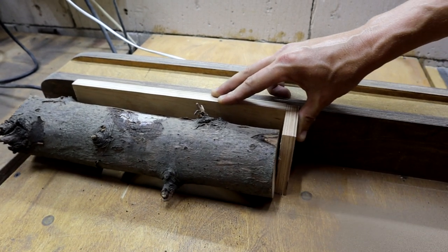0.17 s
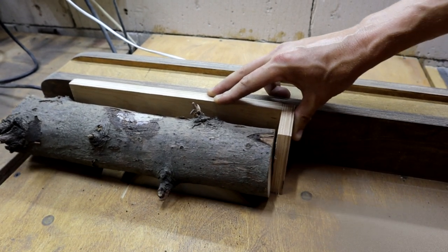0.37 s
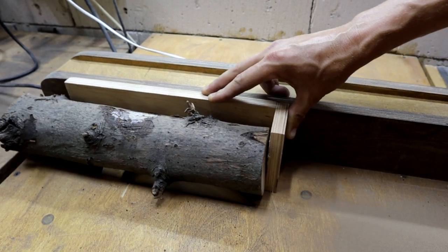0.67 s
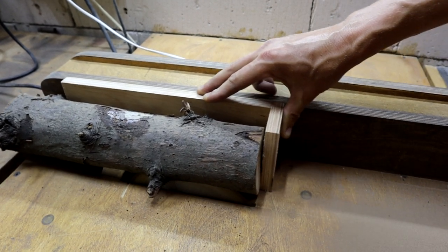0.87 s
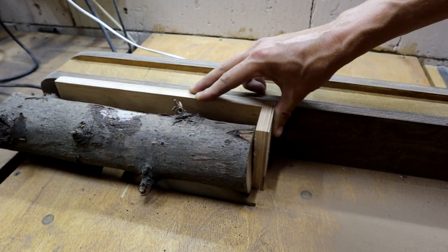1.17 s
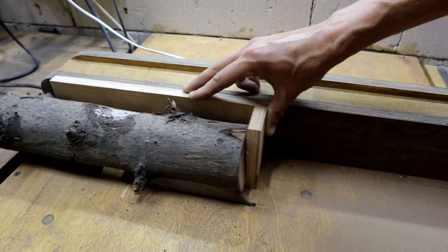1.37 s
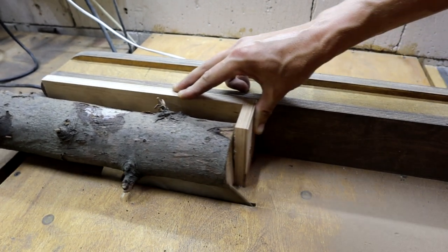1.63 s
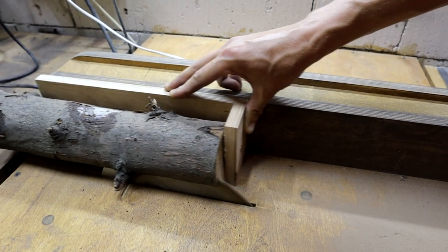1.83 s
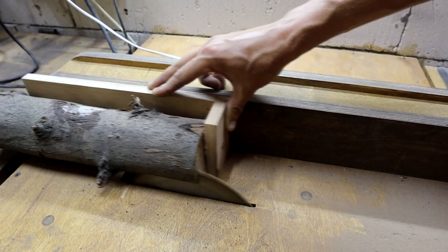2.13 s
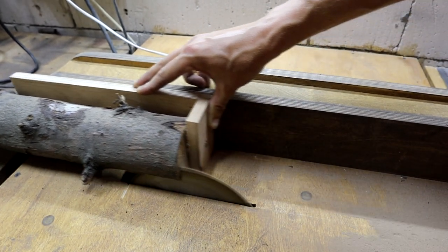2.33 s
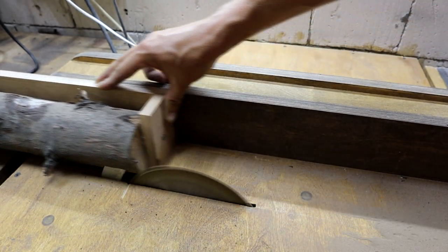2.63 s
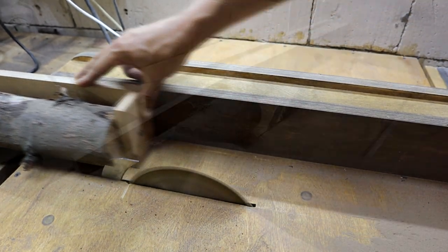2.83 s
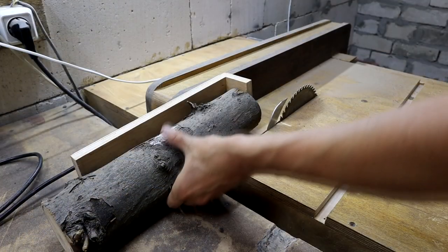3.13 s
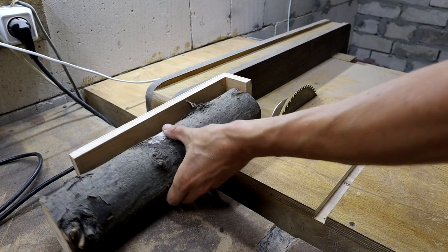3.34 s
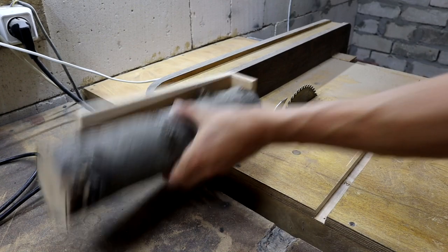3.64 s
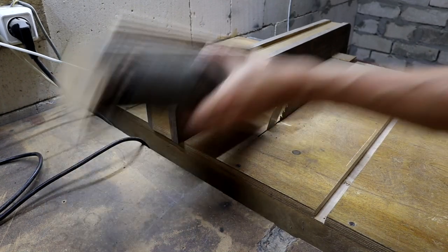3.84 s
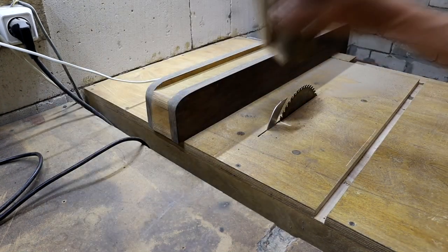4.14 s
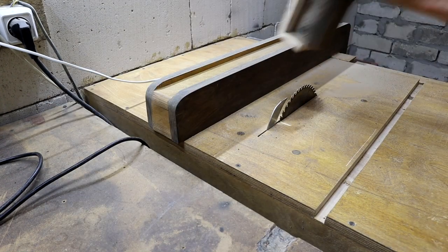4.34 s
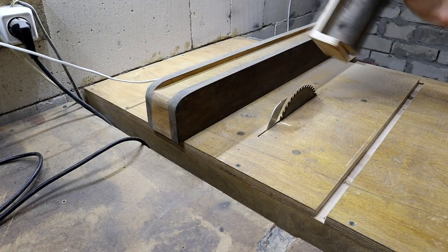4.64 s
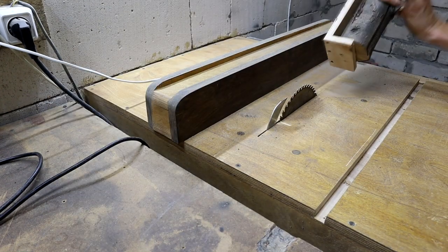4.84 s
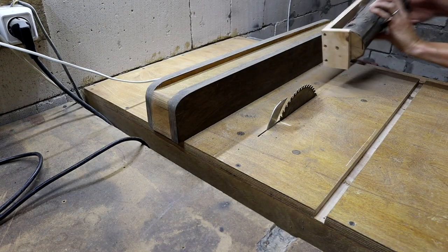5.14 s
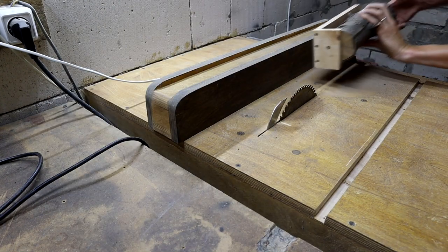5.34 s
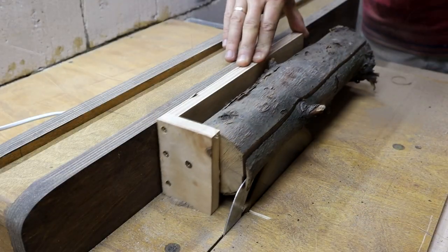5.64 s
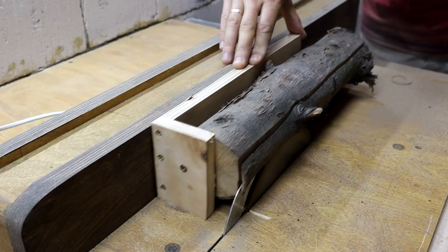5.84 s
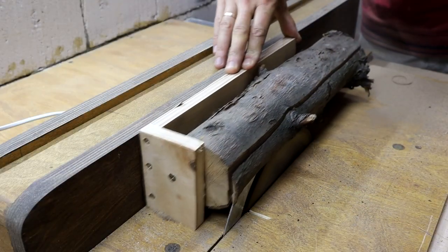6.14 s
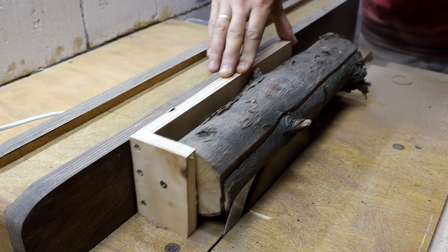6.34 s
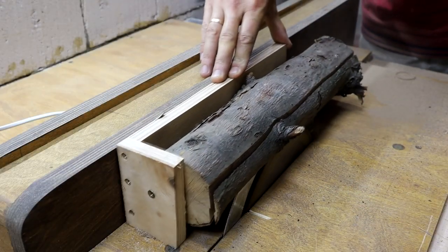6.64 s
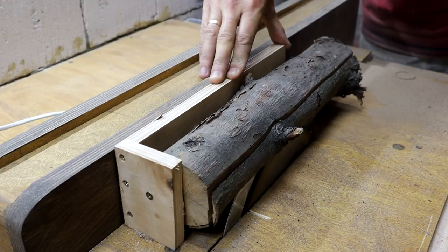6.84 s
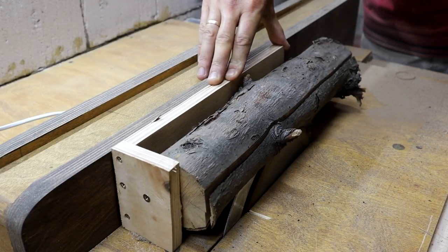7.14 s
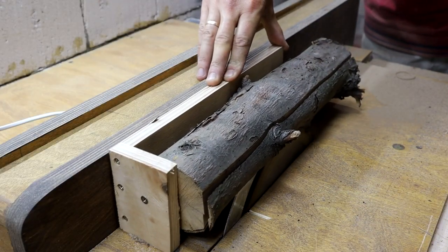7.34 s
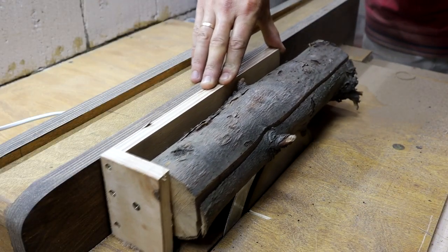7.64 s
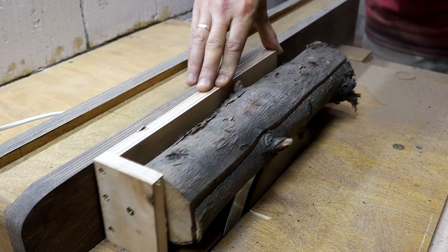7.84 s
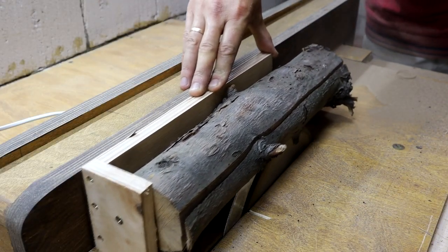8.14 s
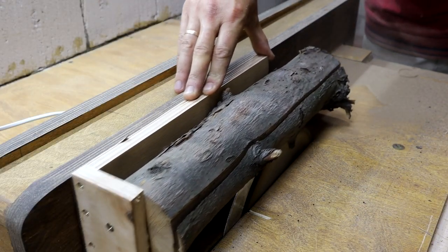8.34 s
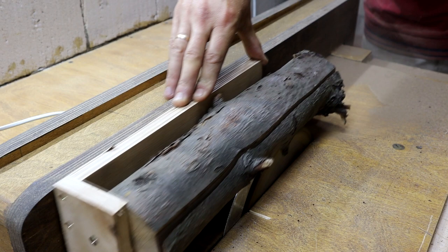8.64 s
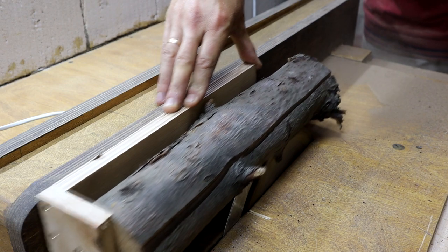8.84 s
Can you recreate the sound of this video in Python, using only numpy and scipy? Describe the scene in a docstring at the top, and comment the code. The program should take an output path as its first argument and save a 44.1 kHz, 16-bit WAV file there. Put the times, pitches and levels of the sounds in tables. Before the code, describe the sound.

From 0 s a table-mounted circular saw is cutting a log: low motor hum near 300 Hz, a rough gear whine around 2 kHz and broadband tearing, hissing chips, with uneven low rumbles in the first second. From about 1.5 s the load eases and pitch climbs steadily by roughly a third; squealing teeth swell around 2.4 s, chip noise drops near 2.7 s, and the free whine fades out by 3.2 s. Quiet workshop air remains. At 3.4 s the log scrapes and thuds, with the heaviest hollow table thump at 3.65 s; light ticks and scrapes follow until 4.0 s. A bright cluster of wooden knocks lands around 4.25 s, then only soft rustles near 5 s. At 5.5 s a second cut fades in quickly, louder and harsher, with gritty tooth hammering and buzzing whine, rising slightly until 6.8 s, then sagging in pitch under load, still sawing at 9 s.

```python
"""Circular saw in a workshop

A geared circular saw under a plywood table rips a log, runs free as the log clears it and fades out.
In the quiet workshop the log and its sled are dragged, lifted and knocked; then a second cut fades in.
Motor, gear mesh and blade teeth are tones in fixed ratios, and chips are shaped noise. Wood struck is a
sum of dying modes and wood dragged is noise through resonances. A mid-side microphone hears it all."""
import sys
import numpy as np
from scipy import signal
from scipy.fft import rfft, irfft, next_fast_len
from scipy.io import wavfile
from scipy.ndimage import uniform_filter1d

SR = 44100
rng = np.random.default_rng(int(sys.argv[2]) if len(sys.argv) > 2 else 0)


def to_wav(s):
    """Save 16-bit WAV."""
    ch = np.atleast_2d(s).T  # columns
    pcm = np.round(np.clip(ch, -1, 1) * 32767)  # PCM
    wavfile.write(sys.argv[1], SR, pcm.astype(np.int16))


N = 396900


def amp(db):
    """Decibel law: amplitude grows tenfold per 20 dB."""
    return 10 ** (np.asarray(db) / 20)


def evened(x):
    """Power normalisation: scales to an rms of 1."""
    return x / np.sqrt(np.mean(x ** 2) + 1e-20)


def read(points, hz):
    """Logarithmic frequency scale: reads a curve between its points."""
    f, value = np.transpose(points)
    return np.interp(np.log(hz + 1), np.log(f + 1), value)


def add(mix, start_s, sound):
    """Superposition: adds a sound from its start time on."""
    part = mix[:, round(start_s * SR):][:, :sound.shape[1]]
    part += sound[:, :part.shape[1]]


def drift(size, span_s):
    """Low-pass random fluctuation: two slow curves of about rms 1."""
    step = 32
    width = max(int(span_s * SR / step), 1)
    noise = rng.standard_normal((2, size // step + 2))
    slow = evened(uniform_filter1d(uniform_filter1d(noise, width), width))
    return np.array([np.interp(np.arange(size) / step, np.arange(slow.shape[1]), row) for row in slow])


def coloured(x, gain):
    """Linear filtering: multiplies the spectrum by a gain given as a function of frequency."""
    size = next_fast_len(x.shape[-1])
    return irfft(rfft(x, size) * gain(np.fft.rfftfreq(size, 1 / SR)), size)[..., :x.shape[-1]]


def humps(modes):
    """Resonance: the powers of the single-mode response curves add."""
    return lambda hz: np.sqrt(sum(amp(2 * db) / (1 + (2 * (hz - f) / w) ** 2) for f, w, db in modes))


# Microphone side level, per cut: (frequency [Hz], side relative to mid [dB])
WIDTHS = [
    [(60, -15), (110, -90), (200, -9.5), (370, -0.5), (690, -2.5), (1270, 0), (2330, -1), (4280, 4.5),
     (7880, 2), (14500, 23.5)],
    [(60, -8), (110, -94), (200, -32), (370, -0.5), (690, -6.5), (1270, 0.5), (2330, 0), (4280, 5.5),
     (7880, 5.5), (14500, 4.5)],
]
# Lateral lean, per cut: (frequency [Hz], share of the side that follows the mid [-], + is left)
LEANS = [
    [(100, -2.1), (370, 0.21), (700, 0.22), (1300, 0.17), (2300, -0.094), (4300, 0.49), (7900, -0.77),
     (14000, -0.62)],
    [(100, 0), (370, -0.24), (700, 0.63), (1300, -0.054), (2300, -0.19), (4300, 0.13), (7900, -0.75),
     (14000, -0.58)],
]
# Phase turn, per cut: (frequency [Hz], share of the side a quarter wave from the mid [-])
TWISTS = [
    [(300, -0.59), (900, -0.41), (2200, -0.086), (3500, 0.52), (7000, -0.42), (12000, 0)],
    [(300, -0.72), (600, 0.2), (1500, -1.2), (2600, 0.87), (5000, 0.34), (12000, -0.79)],
]


def heard(pair, k):
    """Mid-side pick-up: the side mixes the direct sound, turned in phase, with an unrelated reflected one."""
    def width(hz):
        return amp(read(WIDTHS[k], hz))

    def lean(hz):
        share = read(LEANS[k], hz) + 1j * read(TWISTS[k], hz)
        return share / np.maximum(abs(share) / .99, 1)

    direct = coloured(pair[0], lambda hz: width(hz) * lean(hz))
    reflected = coloured(pair[1], lambda hz: width(hz) * np.sqrt(1 - abs(lean(hz)) ** 2))
    side = direct + reflected
    return np.array([pair[0] + side, pair[0] - side])


# Fade of each cut: (silent at [s], full at [s])
FADES = [(3.18, 3.048), (5.485, 5.58)]


def fade(t, k):
    """Linear amplitude ramp: gain of one cut as it fades in or out."""
    silent, full = FADES[k]
    return np.clip((t - silent) / (full - silent), 0, 1)


# Colour of the workshop air: (frequency [Hz], relative level per Hz [dB])
AIR_SPECTRUM = [(15, -56), (25, 12), (78, 3), (99, -16), (328, -12.5), (364, -13.5), (497, -17.5),
                (552, -17.5), (597, -17), (1300, -22.5), (2200, -25.5), (2700, -23.5), (3400, -30.5),
                (8690, -36.5), (10700, -44), (12500, -85), (16200, -64), (22000, -120)]
AIR_DB = -42
AIR_FADED = 0.84  # share of the workshop air that gives way to a cut


def hush():
    """Stationary coloured noise: the air of the workshop, cross-faded with the two cuts."""
    t = np.arange(N) / SR
    noise = rng.standard_normal((2, N)) * amp(0.5 * drift(N, 0.014)[0])
    air = amp(AIR_DB) * evened(coloured(noise, lambda hz: amp(read(AIR_SPECTRUM, hz))))
    return heard(air, 0) * (1 - AIR_FADED * (fade(t, 0) + fade(t, 1)))


# Faint bright clicks: (time [s], peak level before the microphone [dB])
CLICKS = [(3.146, -50), (3.354, -48), (3.482, -43), (3.492, -48), (5.465, -50)]
# Click colour: (frequency [Hz], width [Hz], level [dB])
CLICK_BAND = (7800, 4100, 0)


def clicks():
    """Impulsive noise: short bright clicks that decay exponentially."""
    out, t = np.zeros((2, N)), np.arange(600) / SR
    for start_s, db in CLICKS:
        noise = rng.standard_normal((2, 600))
        burst = coloured(noise, lambda hz: humps([CLICK_BAND])(hz) ** 2) * np.exp(-t / 0.0036)
        add(out, start_s, amp(db) * burst / abs(burst).max())
    return heard(out, 1)


# Rasp colour: (frequency [Hz], relative level per Hz [dB])
RASP = [(59, -31), (100, -2), (246, -16), (517, -20), (803, -26), (1060, -17.5), (3400, -22), (7420, -24),
        (12000, -47.5), (15600, -97), (22000, -120)]
DRAG_ENDS_DB = -21.5  # where a stroke starts and stops, below its peak


def drag(modes, stutter_db, start_s, rise, fall, peak_db, share):
    """Friction excitation: gritty noise, part of it stuttering through the wood's resonances."""
    t = np.arange(0, rise + fall, 1 / SR)
    db = peak_db + DRAG_ENDS_DB * np.maximum(1 - t / rise, (t - rise) / fall) ** 2
    grit = rng.standard_normal((2, len(t))) * amp(0.82 * drift(len(t), .002)[0])
    rasp = evened(coloured(grit, lambda hz: amp(read(RASP, hz))))
    stutter = grit * amp(stutter_db * drift(len(t), 0.0082)[0])
    chatter = evened(coloured(stutter, lambda hz: humps(modes)(hz) ** 1.75))
    sound = amp(db) * (np.sqrt(1 - share) * rasp + np.sqrt(share) * chatter)
    return start_s, heard(sound * signal.windows.tukey(len(t), .1), 1)


# Scrapes of bark and sled, soft rustles, and the hiss that goes with the knocks:
# (start [s], rise [s], fall [s], peak level [dB], power share that chatters in the wood [0-1])
DRAG = [(3.37, 0.047, 0.085, -38.5, 0.97), (3.16, 0.022, 0.088, -48, 0.2), (3.57, 0.14, 0.19, -52, 0.65),
        (3.79, 0.077, 0.051, -40.5, 0.9), (3.9, 0.052, 0.03, -40.5, 0.94), (3.99, 0.017, 0.044, -46, 0.7),
        (4.16, 0.024, 0.086, -44, 0.56), (4.22, 0.019, 0.063, -38, 0), (4.315, 0.0064, 0.049, -40.5, 0),
        (4.47, 0.057, .08, -61, 0.3), (4.915, 0.028, 0.08, -50, 0.16), (4.98, .03, 0.07, -51, 0),
        (5.04, 0.03, 0.088, -50.5, 0.2), (5.16, 0.034, 0.094, -54.5, 0), (5.27, 0.037, .04, -53, 0)]
# Resonances of the log shoved along: (frequency [Hz], width [Hz], level [dB])
BARK = [(805, 81, 2), (1660, 310, -5.5), (2230, 93, -5), (3080, 890, -7), (4420, 300, -16),
        (4860, 200, -10.5), (5750, 200, -18)]
# Resonances of the sled: (frequency [Hz], width [Hz], level [dB])
CHATTER = [(477, 17, 14.5), (753, 104, 15), (1123, 35, 11), (1490, 140, 13), (2220, 140, 7),
           (2580, 230, 10.5), (3040, 140, 1), (4020, 100, -5), (5240, 110, -22)]
# Unevenness of the chatter: bark, sled [dB]
STUTTER_DB = [1.5, -2.5]


def drags():
    """Friction: the first stroke rings the bark, the others rasp or chatter in the sled."""
    out = np.zeros((2, N))
    for i, row in enumerate(DRAG):
        add(out, *drag(CHATTER if i else BARK, STUTTER_DB[i > 0], *row))
    return out


def struck(modes, tilt_db, contact_s, rough, wake_s, detune=0.037):
    """Modal synthesis: dying modes, detuned by where the wood is hit; a soft push with a gritty wake."""
    t = np.arange(SR // 2) / SR
    ring = 0
    for hz, db, t60 in modes:
        level = amp(db + tilt_db * np.log2(hz / 700) - 60 * t / t60)
        ring = ring + level * np.sin(2 * np.pi * hz * rng.normal(1, detune) * t)
    wake = (t[:4000] == 0) + rough * rng.standard_normal(4000) * np.exp(-t[:4000] / wake_s)
    push = np.hanning(max(int(contact_s * SR), 3))
    ring = signal.fftconvolve(ring, np.convolve(wake, push))
    return ring / abs(ring).max()


# Reverberation of the workshop: (frequency [Hz], t60 [s])
SHOP = [(200, 0.66), (700, 0.079), (1500, 0.35), (4000, 0.9), (9000, 1)]


def echo(dry):
    """Reverberation: sparse random reflections that decay at a rate set by frequency."""
    taps = rng.choice([-1., 1.], (2, SR // 2)) * (rng.random((2, SR // 2)) < .05)
    hz, t, z = signal.stft(taps, SR, nperseg=256)
    tail = signal.istft(z * amp(-60 * t / read(SHOP, hz)[:, None]), SR, nperseg=256)[1]
    return signal.fftconvolve(dry, tail / np.linalg.norm(tail[0]), axes=1)[:, :N]


# Log dropped on the hollow table: (time [s], peak level of the dry blow [dB])
THUDS = [(3.371, -15.5), (3.392, -26), (3.591, -29.5), (3.615, -35), (3.652, -6), (3.69, -10.5),
         (3.72, -21), (3.762, -47), (3.86, -27), (3.902, -30), (3.951, -40), (3.991, -46)]
# Modes of the table: (frequency before detuning [Hz], level [dB], t60 [s])
TABLE = [(98, -2.5, 0.54), (123.8, -3, 0.44), (158, -7.5, 0.28), (217, 1.5, 0.24), (256, -10, 0.16),
         (302, 8.5, 0.055), (343, -9, 0.061), (404, 7, 0.04), (480, -30, 0.049), (590, -10, .06)]
# Sled knocked against wood: (time [s], peak level of the dry blow [dB], brightness [0-1])
KNOCKS = [(4.167, -20.5, 0.25), (4.221, -18, 0.3), (4.2355, -7.5, 0.88), (4.239, -8, 0.83),
          (4.245, -20, 0.72), (4.25, -11.5, 1), (4.261, -16, 1), (4.286, -30, 0.85), (4.319, -22.5, 0.26),
          (4.332, -24, 0.25)]
# Modes of the sled: (frequency before detuning [Hz], level [dB], t60 [s])
SLED = [(276, -28, 0.12), (350, 2, 0.061), (455, 11, 0.055), (620, -0.5, 0.13), (752, 23, 0.028),
        (950, 16.5, 0.028), (1215, 27.5, 0.017), (1390, 8.5, 0.016), (1700, -5, 0.025), (1900, -14, .02),
        (2530, -25, .03), (3400, -4, .03), (4080, -13, .03), (5500, -7, .03)]
# Loose sled ticking as it is lifted: (time [s], peak level of the dry blow [dB], tilt [dB per octave])
TICKS = [(3.582, -48, -3), (3.6043, -35.5, 0), (3.6449, -31, -2), (3.682, -41, 4), (3.756, -32, 10),
         (3.7764, -34, 13), (3.796, -37, 16.5), (3.815, -32, 24), (3.8367, -29, 16), (3.852, -28, 15),
         (3.864, -34, 6), (3.881, -27, 11), (3.903, -28, 18), (3.928, -28, 10), (3.95, -29, 10),
         (3.965, -39, 8), (3.987, -41, 18), (3.9994, -28, 6), (4.009, -35, 16), (4.021, -41, 10)]
# The far face of the sled rings apart from the near one; the knocks lie to the right
KNOCK_FLANK_DB, KNOCK_RIGHT_DB = -3, -3


def blows():
    """Impact excitation: thuds, knocks and ticks with the workshop's answer."""
    dry, aside = np.zeros((1, N)), np.zeros((1, N))
    for start_s, db in THUDS:
        add(dry, start_s, amp(db) * struck(TABLE, 0, 0.0024, 0.027, 0.029)[None])
    for start_s, db, bright in KNOCKS:
        tilt_db = 18 * (bright - .75)
        contact_s = 0.0014 * np.maximum(1 - bright, .1)  # a brighter knock touches more briefly
        near = amp(db) * struck(SLED, tilt_db, contact_s, 0.055, 0.016)[None]
        flank = amp(db) * struck(SLED, tilt_db, contact_s, 0.055, 0.016)[None]
        add(dry, start_s, near)
        add(aside, start_s, amp(KNOCK_FLANK_DB) * flank - amp(KNOCK_RIGHT_DB) * near)
    loose_modes = [(hz, db, 4.6 / width) for hz, width, db in CHATTER]  # wide resonances die sooner
    for start_s, db, tilt_db in TICKS:
        add(dry, start_s, amp(db) * struck(loose_modes, tilt_db, .0001, 0.11, 0.0045, 0.016)[None])
    # the blows carry little below 75 Hz
    dry = signal.sosfilt(signal.butter(2, 75, "high", fs=SR, output="sos"), dry)
    wet = echo(dry)
    sound = heard(np.array([dry[0] + amp(-10.0) * wet[0], amp(-1.5) * wet[1]]), 1)
    return sound + [[1], [-1]] * coloured(aside, lambda hz: amp(read(WIDTHS[1], hz)))


# Moments when one sound swells or dips, by sound: (peak time [s], length [s], change [dB])
SWELLS = { "rumble": [(0.53, 0.62, 18), (0.75, 0.23, 11.5), (1.0, 0.17, 9.5), (1.16, 0.1, 9),
          (7.97, 0.042, 5), (8.25, .1, 4)], "roar": [(2.39, 0.11, 9), (2.52, 0.21, 5.5), (2.67, 0.12, 9)],
          "hiss": [(2.44, 0.18, 5.5), (2.56, 0.18, 6.5), (6.78, 0.15, 1)], "hum": [(.53, .08, 0),
          (.68, 0.14, -6), (1.0, 0.066, -3), (1.33, 0.055, -5), (8.37, 0.087, 4)],
          "tooth 2": [(.05, 0.56, 5), (1.3, 0.99, -5), (1.755, 0.068, 5), (1.92, 0.42, -2),
          (2.17, .14, 8.5), (2.31, 0.15, -5)], "tooth 4": [(.15, 0.52, 6), (1.0, 0.49, -3), (1.75, .5, -7),
          (2.05, 0.18, 9), (2.2, .1, -5), (5.71, 0.35, 7), (6.63, 0.26, 8), (7.0, 0.89, 4.5)],
          "tooth 5": [(1.7, 0.57, 15), (6.1, 0.17, 6), (6.34, 0.15, 11), (6.75, 0.17, 8), (7.1, 0.79, 5.5),
          (7.61, 0.46, 4)], "song": [(7.08, 0.73, 14.5), (8.24, 1, 9.5), (8.87, 0.26, 8)], }


def swell(t, name):
    """Raised-cosine envelope: extra dB of one sound over time."""
    return sum(db * np.cos(np.pi * np.clip((t - s) / span, -.5, .5)) ** 2 for s, span, db in SWELLS[name])


SPELL_EDGE_S = 0.026


def spell(t, rows, gain):
    """Trapezoidal envelope: sum of flat spells with short edges."""
    return sum(gain(db) * np.clip(np.minimum(t - start, end - t) / SPELL_EDGE_S + .5, 0, 1)
               for start, end, db in rows)


# Centres of the rumble, log body, roar and hiss bands [Hz]
BAND_HZ = (150, 800, 2900, 7000)
# Chip noise colour, per cut: (frequency [Hz], relative level per Hz [dB])
ROAR = [
    [(30, -25), (75, -8), (95, 6.5), (150, 5), (300, -4), (500, -16), (1000, -22), (1600, -17), (2100, -8),
     (3000, -4.5), (3600, -11.5), (4500, -4.5), (6000, -2.5), (8000, 6), (10000, -7.5), (12000, -39),
     (15000, -70)],
    [(30, -45), (75, -28), (95, -4.5), (130, -4), (250, -11.5), (500, -6.5), (800, -5), (1300, -6),
     (2300, -7), (3600, -8.5), (4700, -8), (5800, -10.5), (8200, -8.5), (10500, -28.5), (12500, -22),
     (14000, -34), (15000, -47)],
]
# Blade and table resonances that chips excite, per cut: (frequency [Hz], width [Hz], level [dB])
RINGS = [
    [(1973, 31, -12), (2640, 15, -10), (2640, 29, -13), (2440, 24, -8), (3310, 20, -4), (3980, 250, -12.5),
     (4600, 19, -1), (4880, 33, -6), (5240, 93, -5.5), (6750, 12, 5.5), (8100, 21, -15), (8450, 33, -7)],
    [(476, 74, 5.5), (558, 21, 10.5), (818, 60, 11), (2180, 100, 2.5), (2715, 59, 4), (2920, 39, -19),
     (4530, 110, 3), (6130, 32, -26), (6800, 53, -3), (7780, 61, -25), (8640, 28, 5), (9460, 79, -2.5)],
]
# Ringing relative to the chip noise before band levelling, per cut [dB]
RING_DB = [-6.5, -3.5]
SLOTS = 3  # expansion slots in the blade


def roar(t, blade, bands_db, k):
    """Amplitude-modulated noise: chips tear off in patches, pulsed by the blade, with ringing bands."""
    bites = 1 + 0.16 * np.cos(2 * np.pi * blade) + 0.14 * np.cos(2 * np.pi * SLOTS * blade)
    chips = rng.standard_normal((2, len(t))) * amp(1.9 * drift(len(t), .003)[0]) * bites
    sound = evened(coloured(chips, lambda hz: amp(read(ROAR[k], hz))))
    # reversed chips keep the ringing unrelated to the noise
    sound = sound + amp(RING_DB[k]) * evened(coloured(chips[:, ::-1], humps(RINGS[k])))
    hz, s, z = signal.stft(sound, SR, nperseg=512, noverlap=384)
    # each band is brought from its own level to the wanted one
    levels = []
    for b, (low, high) in enumerate([(70, 270), (420, 1500), (1700, 5000), (5000, 10000)]):
        power = np.mean(abs(z[0, (hz > low) & (hz < high)]) ** 2, 1)
        own_db = 10 * np.log10(np.sum(power) * 4 / 3)
        levels.append(np.interp(s + t[0], t, bands_db[b]) - own_db)
    shares = [read(list(zip(BAND_HZ, np.eye(4)[b])), hz) for b in range(4)]
    patches = evened(uniform_filter1d(uniform_filter1d(rng.standard_normal(z.shape[1:]), 6, 0), 20, 1))
    streaks = evened(uniform_filter1d(rng.standard_normal(z.shape[1:]), 40, 1))  # narrow bands ring up and fade
    surge = evened(uniform_filter1d(rng.standard_normal(len(s)), 25))  # the hand pushes unevenly
    uneven_db = 0.15 * patches + 2.23 * np.minimum(streaks, 1) + 0.74 * surge
    z = z * amp(np.transpose(shares) @ levels + uneven_db)
    return signal.istft(z, SR, nperseg=512, noverlap=384)[1][:, :len(t)]


# Spells when the teeth hammer the wood: (start [s], end [s], lower ring [dB], upper ring [dB])
HAMMER_SPELLS = [(1.357, 1.563, -49, -44), (1.6, 1.75, -48, -48), (1.98, 2.162, -40, -52),
                 (5.63, 5.707, -45, -40), (5.787, 5.877, -43, -37), (5.9, 6.12, -49.5, -45),
                 (6.15, 6.33, -55, -52), (6.336, 6.564, -41, -42), (6.643, 6.72, -46, -37),
                 (6.75, 7.397, -41.5, -47), (7.603, 8.098, -38, -43), (8.103, 9.1, -35.5, -47.5)]
# Lower and upper ring, per cut: (frequency [Hz], width [Hz])
HAMMER_RINGS = [
    [(2330, 220), (2600, 85)],
    [(2260, 240), (2740, 180)],
]
HAMMER_SPREAD_DB, HAMMER_S = 5, .0022  # how blows differ, and how long one grinds


def hammer(t, blade, slack_db, k):
    """Repeated impacts: about one uneven gritty blow per blade turn rings the blade and the table."""
    beat = np.floor(blade + .15 * drift(len(t), .03)[0])
    sizes = amp(HAMMER_SPREAD_DB * np.minimum(rng.standard_normal(len(t)), 1.0))
    hits = (np.diff(beat, prepend=beat[0]) > 0) * sizes
    envelope = signal.oaconvolve(hits, np.exp(-np.arange(800) / (HAMMER_S * SR)))[:len(t)]
    grind = envelope * rng.standard_normal((2, len(t)))
    out = 0
    for j, (centre, width) in enumerate(HAMMER_RINGS[k]):
        ring = evened(coloured(grind, lambda hz: 1 / (1 + (2 * (hz - centre) / width) ** 2)))
        out = out + ring * spell(t, [(start, end, db[j]) for start, end, *db in HAMMER_SPELLS], amp)
    return amp(slack_db) * out


def line(turns, db, waver_db, span_s=.025):
    """Phase-locked tone: it follows the shaft; load and play waver its level, differently on each path."""
    phase = 2 * np.pi * (turns + rng.random() + np.array([[0], [.25]]))
    return np.sqrt(2) * amp(db + waver_db * drift(len(turns), span_s)) * np.sin(phase)


GEAR = 7 / 37  # blade turns per armature turn
# Blade mode, per cut: (frequency [Hz], width [Hz])
SONG = [(7900, 690), (8600, 870)]


def song(blade, blade_hz, song_db, k):
    """Order resonance: the blade mode sings as the slot orders pass its frequency."""
    centre, width = SONG[k]
    out = 0
    for order in range(123, 153, SLOTS):
        near_db = -10 * np.log10(1 + (2 * (order * blade_hz - centre) / width) ** 4)
        out = out + line(order * blade, song_db + near_db, 1.0)
    return out


# Level of the rattle bursts relative to the mesh level, per cut: (mesh tone [dB], its octave [dB])
RATTLE_DB = [(-5, -17), (2, -9)]
# Burst size before evening, per cut: (by chance [dB], once per blade turn [dB])
RATTLE_BEAT_DB = [(3, 5), (3, 13)]
# How far each burst lands early or late, per cut [mesh turns]
SLIPS = [.09, .15]
BEAT_SLIP = .045  # how far a burst strays from the blade turn (turns)


def rattle(shaft, blade, mesh_db, k):
    """Gear backlash: bursts of the mesh tone and its octave, modulated in level and phase."""
    size = len(shaft)
    chance_db, turn_db = RATTLE_BEAT_DB[k]
    luck = np.minimum(drift(size, .004)[0], 1.2)
    beat = np.cos(2 * np.pi * (blade + BEAT_SLIP * drift(size, 0.0094)[0]))
    play = evened(amp(chance_db * luck + turn_db * beat))
    slip = SLIPS[k] * drift(size, .005)[0]
    return sum(play * line(m * (7 * shaft + slip), mesh_db + relative_db, 1.1)
               for m, relative_db in enumerate(RATTLE_DB[k], 1))


# Levels of armature hum, its octave and gear mesh as the table speaks them, per cut and tone:
# (pitch passed [Hz], level [dB])
TABLE_TONES = [
    [[(297, -38.5), (315, -35), (340, -42), (353, -31.5), (376, -27.5), (385, -19.5), (391, -30.5)],
     [(600, -55.5), (640, -55), (680, -41), (706, -47), (730, -39.5), (748, -44), (770, -40)],
     [(2080, -52.5), (2200, -48), (2450, -45), (2560, -69), (2730, -60.5)]],
    [[(332, -47), (339, -44), (345, -37), (357, -36.5)], [(664, -44.5), (680, -43), (695, -40.5),
     (704, -39.5), (714, -37.5)], [(2320, -42.5), (2400, -42), (2460, -49), (2500, -51.5)]],
]
# 2nd, 4th and 5th tooth tone and blade song at full hiss, per cut [dB]
TEETH_DB = [(-47, -51, -74.5, -51), (-45, -47.5, -44.5, -55)]
# Teeth rub the last wood: (start [s], rise [s], 2nd tooth tone [dB], 4th tooth tone [dB])
SQUEAL = (2.324, 0.2, 16, 24.4)
TEETH_FOLLOW = 2.6  # tooth tone and song dB per dB of hiss
CLEAR_S, CLEAR_DB = 2.71, -25  # the log leaves the blade and the 2nd and 4th tooth tones drop


def tone_levels(t, hz, hiss_db, spells_db, k):
    """Forced vibration: levels of hum, octave, mesh, three tooth tones and song follow pitch and load."""
    db = [read(points, m * hz) for m, points in zip((1, 2, 7), TABLE_TONES[k])]
    db = [db[0] + swell(t, "hum"), db[1] + swell(t, "hum"), db[2] + spells_db]
    for full_db, name in zip(TEETH_DB[k], ["tooth 2", "tooth 4", "tooth 5", "song"]):
        db.append(full_db + TEETH_FOLLOW * hiss_db + swell(t, name))
    if k == 0:
        start, rise, *squeal_db = SQUEAL
        for j, extra_db in zip((3, 4), squeal_db):
            rub_db = extra_db * np.clip((t - start) / rise, 0, 1)
            db[j] = db[j] + rub_db + CLEAR_DB * np.clip((t - CLEAR_S) / .02, 0, 1)
    return db


# Further tones of armature and blade:
# (armature multiple, plus blade turns, index of the tone whose level it follows, 0 = hum)
SIDE_TONES = [(.5, 0, 0), (1.5, 0, 1), (3, 0, 1), (4, 0, 1), (5, 0, 1), (6, 0, 1), (8, 0, 1), (0, 44, 3),
              (7, -1, 2), (7, 1, 2), (14, 0, 2), (14, -1, 2), (21, 0, 4), (0, 4, 4), (0, 42, 3), (0, 72, 5),
              (0, 93, 4), (0, 102, 4), (0, 108, 4), (0, 114, 4), (0, 144, 5)]
# Level of each further tone relative to the one it follows, per cut [dB]
SIDE_DB = [
    [-15.5, -18, -7.5, -12.5, -29, -16, -23, -7, -5.5, -7, -7.5, -11, -22, -13, -11, 9, -12, -15, -6, -11,
     7],
    [-17.5, -3.5, -13, -49, -8.5, -43, -7.5, -25, -4, -10, -4.5, -25, -13, -6, -23, -5.5, -29, -23, -4, -2,
     -11.5],
]
# The part of the mesh tone that does not rattle, relative to the mesh level, per cut [dB]
STEADY_DB = [4, 4.5]
# Mesh sidebands relative to the mesh level, per cut: (one throb below [dB], one above [dB])
THROB_DB = [(0.14, -13), (-1, -3)]
# Thump of the blade once per turn, per cut [dB]
WOBBLE_DB = [-55, -56]
TEETH = 24
THROB_HZ = 100  # the motor's pull throbs twice per mains cycle


def machine_tones(t, shaft, blade, db, k):
    """Rotating-machine orders: hum, mesh and tooth tones lock to the turns; a throb adds mesh sidebands."""
    mesh = 7 * shaft
    turns = [shaft, 2 * shaft, mesh, 2 * TEETH * blade, 4 * TEETH * blade, 5 * TEETH * blade]
    out = line(blade, WOBBLE_DB[k], 1.5, .1)
    for j, waver_db in enumerate([1.1, 0.83, 1.5, 3.2, 3.5, 3]):
        out += line(turns[j], db[j] + STEADY_DB[k] * (j == 2), waver_db)
    for (m, extra, j), relative_db in zip(SIDE_TONES, SIDE_DB[k]):
        out += line(m * shaft + extra * blade, db[j] + relative_db, 2.8, 0.035)
    for way, relative_db in zip((-1, 1), THROB_DB[k]):
        out += line(mesh + way * THROB_HZ * t, db[2] + relative_db, 2.2, 0.03)
    return out


# Depth of each cut, relative to full load:
# (time [s], table rumble [dB], cutting roar [dB], chip hiss [dB])
CUTS = [
    [(0.0, 2, 3, 1), (0.45, -12.5, 0.5, -1.5), (0.8, 0, 2, 0), (1.5, 9.5, 1.5, 1.5), (1.95, 0, -4.5, -1),
     (2.3, -2, -3, -0.5), (2.66, -12, -11.5, -5), (2.7, -11.5, -11, -8), (3.2, -6, -13, -12)],
    [(5.48, 3, -4, -4), (5.9, -1, 2, 0), (6.45, -2, -1.5, -1.5), (6.8, -3, 1.5, 0.5), (7.4, 0.5, 2.5, 0.5),
     (7.8, 0.5, 0.5, -1), (8.4, 2, 2, -1.5), (9.0, 1, 3, 1)],
]
# Armature speed of each cut before inertia rounds it: (time [s], speed [Hz])
SPEEDS = [
    [(0.0, 296.6), (0.22, 296), (0.41, 299.2), (0.61, 301), (.78, 300.8), (1.01, 296.4), (1.2, 298.6),
     (1.42, 301.2), (1.62, 306.8), (1.82, 318.4), (2.23, 353.2), (2.43, 367.2), (2.83, 384.6),
     (3.24, 391.6)],
    [(5.46, 351.4), (6.05, 351.1), (6.8, 357), (7.03, 354.7), (7.62, 342.6), (8.21, 333.3), (8.41, 331.5),
     (9.0, 331.2)],
]
# Spells when the gears mesh hard or go slack: (start [s], end [s], change [dB])
MESH_SPELLS = [(-.1, 0.432, 12.5), (0.493, .69, 1), (.77, 0.99, 12), (1.02, 1.14, 11), (1.21, 1.32, 6),
               (1.338, 1.47, 5), (1.552, 1.66, 4.5), (1.67, 1.757, -6), (1.767, 1.845, -1),
               (1.86, 2.224, -5.5), (7.454, 7.55, 2.5), (7.554, 7.594, -13), (7.735, 7.765, -9),
               (7.89, 7.934, -5), (7.955, 7.98, -6), (8.027, 8.063, 5), (8.083, 8.1, 0), (8.18, 8.194, -3),
               (8.325, 8.344, -8)]
# Full load, per cut: (rumble [dB], log body [dB], roar [dB], hiss [dB])
FULL_DB = [(-50, -40.5, -34.5, -40.5), (-42, -36, -33.5, -35.5)]
# Log body level, per cut: (dB per dB of roar [-], dB per dB of rumble [-])
BODY_FOLLOWS = [(-.3, -0.027), (0, -0.61)]
FLUTTER = .0012  # the rim runs early or late in the wood and blurs the tooth tones (blade turns)


def cut(k):
    """Source superposition: motor hum, gear whine, tooth tones and chip noise of one pass of the log."""
    s, *depth = np.transpose(CUTS[k])
    t = np.arange(s[0], s[-1], 1 / SR)
    rumble, rip, hiss = (np.interp(t, s, column) for column in depth)
    hz = uniform_filter1d(np.interp(t, *np.transpose(SPEEDS[k])), SR // 8, mode="nearest")  # inertia
    shaft = np.cumsum(hz) / SR
    blade = GEAR * shaft + FLUTTER * drift(len(t), .012)[0]
    spells_db = spell(t, MESH_SPELLS, np.asarray)
    db = tone_levels(t, hz, hiss, spells_db, k)
    sound = machine_tones(t, shaft, blade, db, k)
    sound += hammer(t, blade, np.minimum(spells_db, 0), k)
    sound += rattle(shaft, blade, db[2], k)
    sound += song(blade, GEAR * hz, db[-1], k)
    body = BODY_FOLLOWS[k][0] * rip + BODY_FOLLOWS[k][1] * rumble
    bands = [rumble + swell(t, "rumble"), body, rip + swell(t, "roar"), hiss + swell(t, "hiss")]
    sound += roar(t, blade, np.array(bands) + np.transpose([FULL_DB[k]]), k)
    return t[0], heard(sound, k) * fade(t, k)


def scene():
    """Superposition: the workshop's air, clicks and wood sounds, then both cuts."""
    mix = hush() + clicks() + drags() + blows()
    for k in range(len(CUTS)):
        add(mix, *cut(k))
    return mix


RUMBLE_CUT_HZ, EDGE_HZ = 93, 15100  # bass roll-off and upper band limit


def record(dry):
    """Band-pass response: bass roll-off of the microphone, then the band limit."""
    lean = signal.sosfilt(signal.butter(2, RUMBLE_CUT_HZ, "high", fs=SR, output="sos"), dry)
    return signal.oaconvolve(lean, signal.firwin(511, EDGE_HZ, window=("kaiser", 9), fs=SR)[None], "same")


dry = scene()
out = record(dry)
to_wav(out)
```